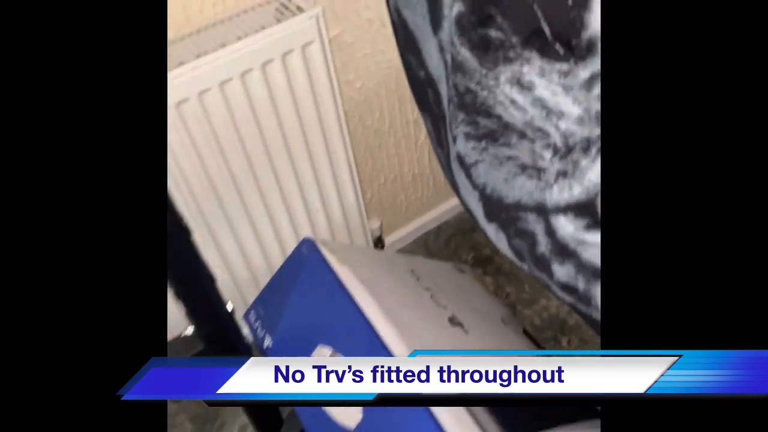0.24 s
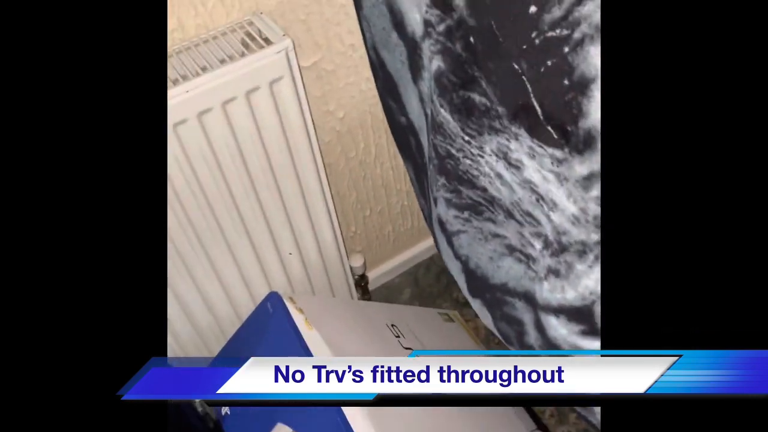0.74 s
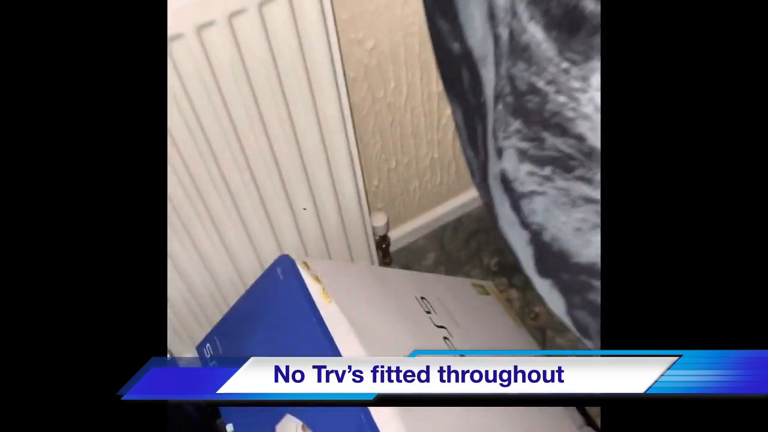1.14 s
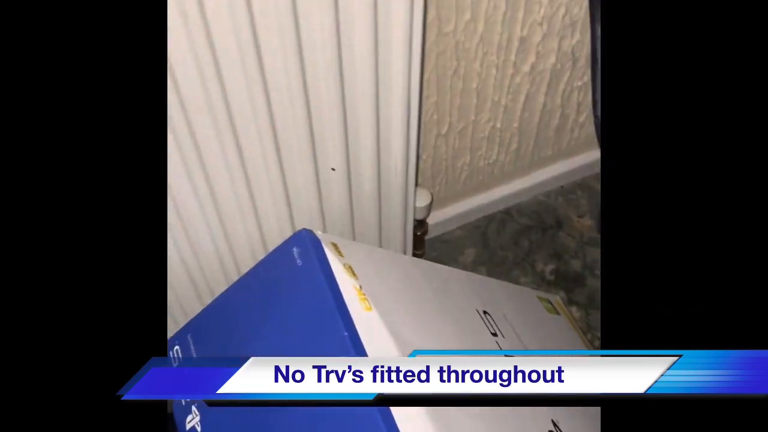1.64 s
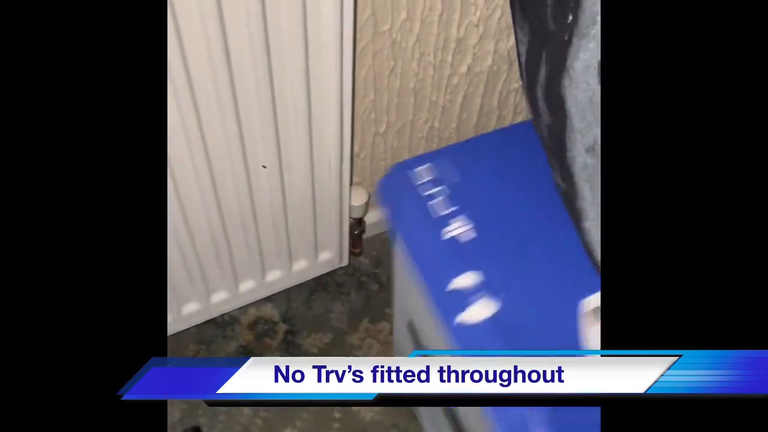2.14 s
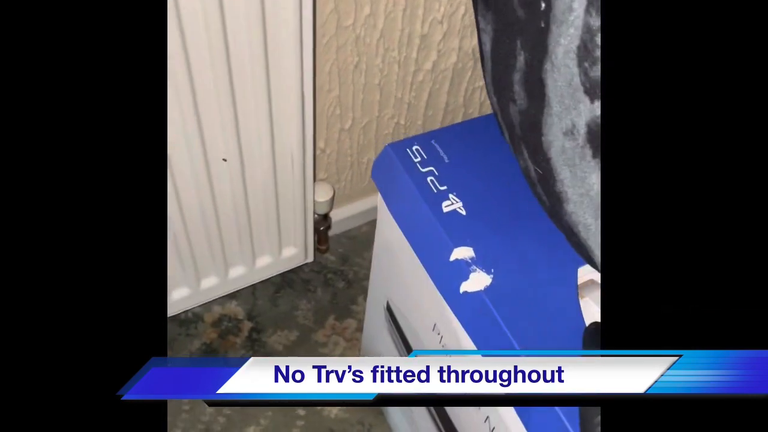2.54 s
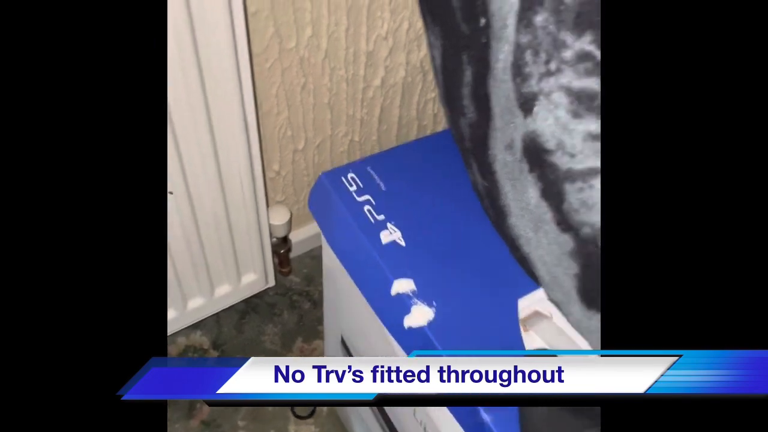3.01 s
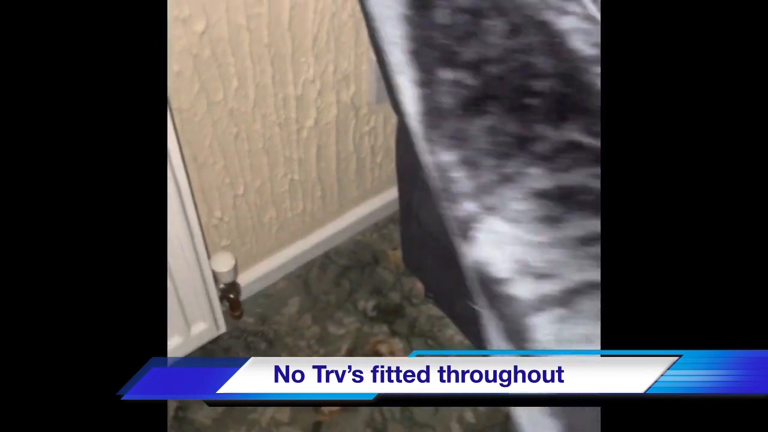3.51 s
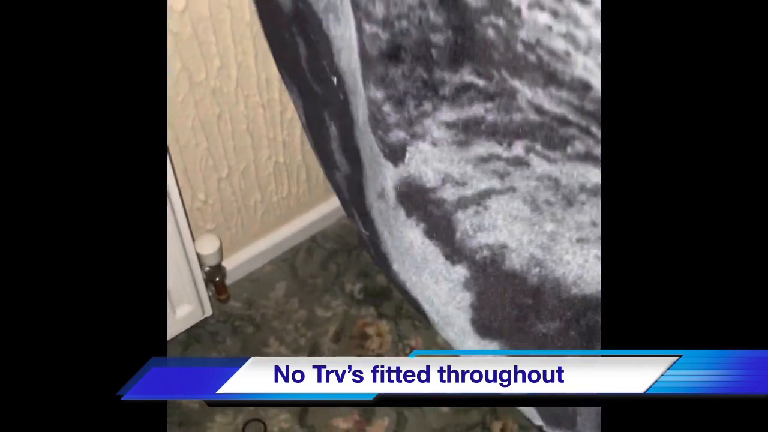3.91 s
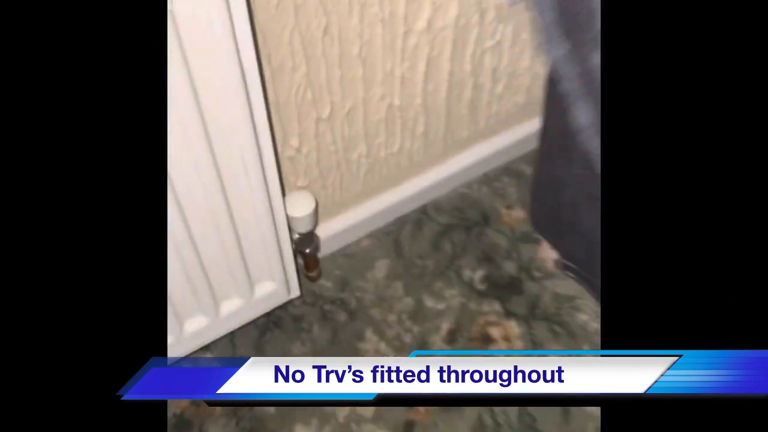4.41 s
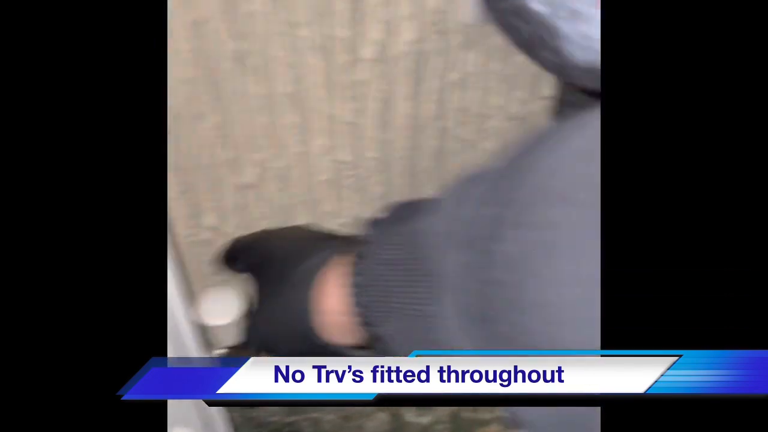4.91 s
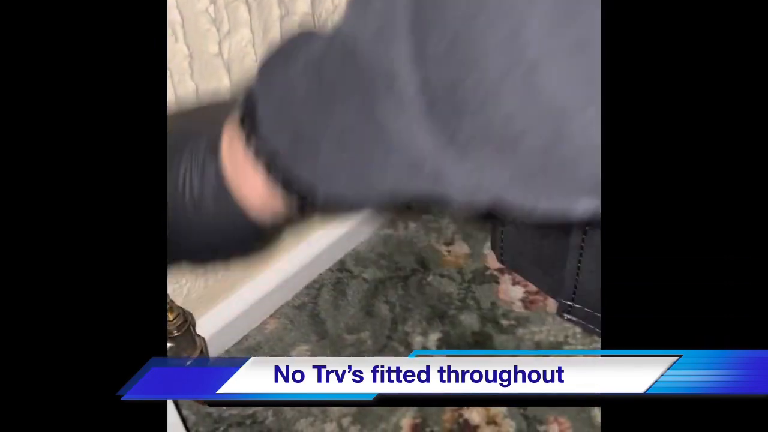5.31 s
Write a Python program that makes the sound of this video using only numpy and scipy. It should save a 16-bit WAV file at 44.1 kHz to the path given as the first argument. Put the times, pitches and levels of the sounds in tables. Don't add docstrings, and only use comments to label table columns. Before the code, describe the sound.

A small carpeted room with quiet, deep air, heard closely on a phone. At 0.0 s a light, loose-frame knock rattles, then faint brushing and soft footfalls follow, with a small snap at 0.8 s. Around 1.65 s a hollow cardboard box bumps sharply, crackling and booming. From 2.0 to 2.45 s it is shifted with taps, snaps and a heavier floor thud near 2.2 s; more dull slaps and booms come at 2.75 and 2.93 s. Cloth and board rustle at 3.2 to 3.9 s with weaker knocks. A bright tap and a small thin ring land about 4.2 s, a soft foot thud at 4.67 s, then near quiet with tiny ticks around 4.9 s. From 5.1 s a stiff valve squeals and groans, rising to a pipe note; at 5.26 s a loud, hard crack rings the steel radiator, bouncing, clattering and fading to the end.

```python
import sys
import numpy as np
from scipy import signal
from scipy.fft import rfft, irfft, next_fast_len
from scipy.io import wavfile

SR = 44100
rng = np.random.default_rng(int(sys.argv[2]) if len(sys.argv) > 2 else 0)


def pcm_store(signal):
    levels = np.round(np.clip(np.atleast_2d(signal), -1, 1) * 32767)
    wavfile.write(sys.argv[1], SR, levels.astype(np.int16).T)


def ratio_of_db(decibels):
    return 10 ** (np.asarray(decibels, float) / 20)


N = 244734
T, M = np.arange(N) / SR, next_fast_len(N)
HZ = np.maximum(np.fft.rfftfreq(M, 1 / SR), 1)
JOLT_RISE_S = 0.0061


def read(points):
    hz, db = np.transpose(points)
    return ratio_of_db(np.interp(np.log(HZ), np.log(hz), db))


def shape(x, gain):
    y = irfft(rfft(x, M) * gain, M)[:N]
    return y / np.sqrt(np.mean(y ** 2))


def band(lo_hz, hi_hz):
    return 1 / np.sqrt((1 + (lo_hz / HZ) ** 6) * (1 + (HZ / hi_hz) ** 6))


def rings(peaks):
    return sum(ratio_of_db(db) / (1 + 2j * (HZ - hz) / np.clip(width, 6, 200)) for hz, width, db in peaks)


def grains(rate, depth_db, ms):
    size = (rng.random(N) < rate / SR) * ratio_of_db(depth_db * rng.random(N))
    forget = np.exp(-1000 / (ms * SR))
    return np.sqrt(1 + signal.lfilter([1], [1, -forget], size ** 2))


def swells(rows, rise_s, t60, rest_db=-120):
    power = ratio_of_db(rest_db) ** 2
    for s, hold, db in rows:
        age = T - s
        rise = np.clip(age / rise_s + .5, 0, 1) ** 2
        fade = 1000 ** (-np.maximum(age - rise_s / 2 - hold, 0) / t60)
        power = power + (ratio_of_db(db) * rise * fade) ** 2
    return np.sqrt(power)


def add(out, s, x):
    i = int(s * SR)
    out[i:i + len(x)] += x[:N - i]


def strike(modes, push_ms, rattle_db=-60, rattle_s=.1, wobble=0.):
    t = T[:SR // 2]
    slow = signal.lfilter(*signal.butter(2, 43, fs=SR), rng.standard_normal((len(modes), len(t))))
    waver = wobble * slow / slow.std()
    ring = np.zeros(len(t))
    for (hz, db, t60), w in zip(modes, waver):
        ring += ratio_of_db(db) * np.sin(2 * np.pi * hz * t + w * hz / 1000) * 1000 ** (-t / min(t60, 1))
    force = ratio_of_db(rattle_db) * rng.standard_normal(len(t)) * 1000 ** (-t / rattle_s)
    force[0] = 1
    force = np.convolve(force, np.hanning(int(push_ms * SR / 1000) + 3))
    y = signal.fftconvolve(ring, force)[:len(t)]
    return y / np.abs(y).max()


def taps(rows, treble_db, rise_s=0.004, narrow=2.6):
    out, t = np.zeros(N), T[:8192]
    noise = rng.standard_normal((len(rows), 8192))
    hz_axis = np.fft.rfftfreq(8192, 1 / SR) + 1
    edge = ratio_of_db(treble_db - 10.0) * (hz_axis / 3000) / (1 + (hz_axis / 4500) ** 4.3)
    for (s, db, hz, t60), v in zip(rows, noise):
        board = 1 / (1 + (narrow * (hz_axis / hz - hz / hz_axis)) ** 2) ** 0.63
        fade = 1000 ** (-t / np.clip(t60, .006, .3))
        body, bright = irfft(rfft(v) * board), irfft(rfft(v) * edge)
        burst = (body + bright * fade ** (1 / 0.71 - 1)) / (body + bright).std()
        add(out, s, ratio_of_db(db - 2) * burst * (1 - np.exp(-t / rise_s)) * fade)
    return out


def thuds(rows, over_db):
    ratios = (.6, 1.452, 2.1, 2.899)
    out, t = np.zeros(N), T[:SR // 4]
    chance = rng.random((len(rows), 2, len(ratios)))
    for (s, db, hz, t60), (bend, turn) in zip(rows, chance):
        t60 = np.clip(t60, .03, .35)
        ring = np.sin(2 * np.pi * hz * t) * 1000 ** (-t / t60)
        for ratio, b, p in zip(ratios, bend, turn):
            over_hz = hz * ratio * (.9 + 0.21 * b)
            ring += ratio_of_db(over_db) * np.sin(2 * np.pi * (over_hz * t + p)) * 1000 ** (-t / (0.52 * t60))
        add(out, s, ratio_of_db(db + 1.0) * ring * (1 - np.exp(-t * hz / 0.42)))
    return out


def tail(t60, top_hz):
    t = T[:SR // 2]
    v = signal.lfilter(*signal.butter(1, top_hz, fs=SR), rng.standard_normal(len(t)))
    v = v * 1000 ** (-t / t60) * (1 - np.exp(-(t / .004) ** 2))
    return v / np.sqrt(np.sum(v ** 2))


def room_air():
    # pitch_hz, level_db (per Hz)
    air_colour = [(16, -58), (28, -1.5), (48, 3.5), (70, -5.5), (203, -10), (261, -9), (1350, -22),
                  (3850, -30.5), (5540, -45), (6500, -43), (8450, -95), (14300, -120)]
    gain = read(air_colour) * band(10, 13000)
    return np.array([ratio_of_db(-58) * shape(rng.standard_normal(N), gain) for _ in "ab"])


def ping():
    # start_s, level_db, push_ms
    ping_hit = (4.241, -40, 0.24)
    # pitch_hz, level_db, t60_s
    ping_modes = [(725, -4.5, 0.76), (728, -3, 0.25)]
    out = np.zeros(N)
    s, db, push_ms = ping_hit
    add(out, s, ratio_of_db(db) * strike(ping_modes, push_ms))
    return out


def frame_knock():
    # start_s, level_db, push_ms
    frame_hit = (0.02, -22, 0.2)
    # pitch_hz, level_db, t60_s
    frame_modes = [(333, -4.5, 0.128), (383.7, -1, 0.23), (427, -28, 0.17), (657, -10.5, 0.26),
                   (800, -21, 0.4), (1210, -27, .12), (1980, -10, 0.13)]
    out = np.zeros(N)
    s, db, push_ms = frame_hit
    add(out, s, ratio_of_db(db) * strike(frame_modes, push_ms, rattle_db=-31.0, rattle_s=0.031, wobble=2.2))
    return out


def panel_blow():
    # start_s, level_db, push_ms
    crack_hit = (5.263, -4.3, .08)
    # pitch_hz, level_db, t60_s
    crack_modes = [(1470, 18, 0.004), (1100, 4, 0.012), (5870, -2, 0.0075), (2780, -10.5, 0.023),
                   (10940, 9, 0.0039), (12800, 7, 0.0061), (14200, -11, .002)]
    # late_s, level_db
    crack_blows = [
        (0, -9),
        (.0007, 0),
        (.00138, -3),
    ]
    # start_s, level_db, push_ms
    panel_hits = [
        (5.263, -21.5, 0.08),
        (5.282, -28.5, 0.19),
        (5.297, -34.5, 0.32),
    ]
    # pitch_hz, level_db, t60_s
    panel_modes = [(401, -7, 0.21), (500, -10.5, 0.98), (541, 1.5, 0.1), (619, -8, 0.3), (990, -20, 0.48),
                   (1042, -2.5, 0.79), (1065, -13, 0.48), (1100, -3, 0.61), (1178, 6.5, 0.096),
                   (1220, -20, 0.36), (1392, 13.5, 0.038), (1441, -27, 0.42), (1540, -5, 0.19),
                   (1575, -4, 0.27), (1700, -22, 0.23), (1910, -23, .2), (2358, -16, .28),
                   (2740, -13, 0.22), (2630, -17, 0.6), (2970, -24, 0.21), (3430, -25, 0.18)]
    out = np.zeros(N)
    start, db, push_ms = crack_hit
    crack = ratio_of_db(db) * strike(crack_modes, push_ms)
    for late, blow_db in crack_blows:
        add(out, start + late, ratio_of_db(blow_db) * crack)
    for s, db, push_ms in panel_hits:
        add(out, s, ratio_of_db(db) * strike(panel_modes, push_ms, rattle_db=-25.5, rattle_s=0.42, wobble=0.85))
    return out


def panel_sway():
    # start_s, level_db, push_ms
    sway_hit = (5.296, -20, 7.8)
    # pitch_hz, level_db, t60_s
    sway_modes = [(51, -1, 1), (123, -9, 0.78), (89.5, -12, 0.37), (232, -18, .4)]
    out = np.zeros(N)
    s, db, push_ms = sway_hit
    add(out, s, ratio_of_db(db) * strike(sway_modes, push_ms))
    return out


def panel_shudder():
    # time_s, level_db
    shudder_path = [
        (5.105, -52),
        (5.125, -39),
        (5.17, -40),
        (5.185, -48),
        (5.205, -35.5),
        (5.26, -40),
        (5.3, -45.5),
        (5.55, -45.5),
    ]
    # pitch_hz, width_hz, level_db
    shudder_modes = [(52.6, 16, 5), (92, 22, 4.5), (178, 26, -6.5)]
    s, db = np.transpose(shudder_path)
    return ratio_of_db(np.interp(T, s, db, -120)) * shape(rng.standard_normal(N), rings(shudder_modes))


def sheet_clatter():
    # start_s, peak_db, centre_hz, t60_s
    clatter_rows = [
        (5.266, -29, 2230, .16),
        (5.27, -31, 3050, .14),
        (5.267, -33, 6000, .04),
        (5.3, -33, 1600, .3),
        (5.31, -44, 2800, .25),
    ]
    return taps(clatter_rows, -60, rise_s=0.0014, narrow=5.5)


def valve():
    # time_s, slip_hz, squeal_db, grip_db (grip feeds overtones and grind)
    groan_path = [
        (5.098, 500, -59, -76),
        (5.133, 524, -35, -56),
        (5.16, 549.6, -30, -48.5),
        (5.184, 575, -40.5, -43.5),
        (5.199, 581, -27, -46),
        (5.227, 580.6, -30.5, -48),
        (5.26, 559, -59, -39.5),
        (5.298, 500, -41, -37.5),
        (5.34, 510, -65, -83),
    ]
    # start_s, hold_s, level_db
    pipe_jolt = (5.222, 0.041, -39)
    # pitch_hz, width_hz, level_db
    pipe_modes = [(425.6, 9.5, 2), (476, 10, -6.5)]
    # pitch_hz, width_hz, level_db
    grind_modes = [(1400, 70, -6), (1680, 80, -2), (2300, 90, -8), (2880, 90, -12), (3900, 150, -18)]
    s, hz, squeal_db, grip_db = np.transpose(groan_path)
    grind_db = -36 + 1.1 * (grip_db + 40)
    squeal, over, grind = (ratio_of_db(np.interp(T, s, db, -120, -120)) for db in (squeal_db, grip_db, grind_db))
    pipe = ratio_of_db(-11.5) * squeal + swells([pipe_jolt], JOLT_RISE_S, t60=0.21)
    wobble, flutter = (shape(rng.standard_normal(N), band(0.71, 66.5)) for _ in "ab")
    turn = 2 * np.pi * np.cumsum(np.interp(T, s, hz) * (1 + 0.0181 * wobble)) / SR
    overtones = np.sin(2 * turn) + 0.17 * np.sin(3 * turn) + 0.059 * np.sin(4 * turn)
    tone = squeal * np.sin(turn) + over * overtones
    slip = grains(rate=230.0, depth_db=9.0, ms=3.0) * rng.standard_normal(N)
    out = np.sqrt(2) * tone * ratio_of_db(1.8 * flutter)
    out += pipe * shape(slip, rings(pipe_modes))
    return out + grind * shape(slip, band(670, 1050) + 0.3 * rings(grind_modes))


def pipe_singing():
    # start_s, hold_s, level_db, pitch_hz
    sing_rows = [
        (5.193, 0.029, -30, 540),
        (5.222, .035, -27, 425),
        (5.232, .025, -30.5, 487),
        (5.2, 0.038, -43, 797),
        (5.175, .02, -39.5, 1125),
        (5.135, .03, -41, 470),
    ]
    out = np.zeros(N)
    for s, hold, db, hz in sing_rows:
        waver = 0.57 * shape(rng.standard_normal(N), band(1, 38))
        level = swells([(s, hold, db)], JOLT_RISE_S * 2, t60=0.14)
        out += np.sqrt(2) * level * np.sin(2 * np.pi * hz * T + waver)
    return out


def footfalls():
    # start_s, peak_db, pitch_hz
    step_rows = [(0.445, -37.5, 59), (.979, -38, 48.3), (1.274, -30, 65), (1.406, -37, 52),
                 (1.708, -26, 67), (2.19, -17.5, 68), (2.312, -27.5, 53), (3.243, -34.5, 71),
                 (3.386, -44, 67.5), (3.641, -37, 70), (3.7, -29, 57.7), (4.289, -34.5, 51),
                 (4.466, -30, 59.2), (4.671, -18.5, 63.8), (4.747, -35, 78.4), (5.262, -21.5, 92),
                 (5.303, -22, 150.4)]
    return thuds([(*row, 0.13) for row in step_rows], over_db=-10)


def strokes():
    # start_s, length_s, level_db, centre_hz, width (share of centre)
    stroke_rows = [(0.225, 0.046, -65, 1900, 0.27), (0.279, 0.036, -58, 1940, 0.25),
                   (0.861, 0.035, -52.5, 1840, 0.34), (0.888, 0.055, -58, 2180, 0.44),
                   (0.956, 0.04, -52.5, 515, 0.72), (1.232, 0.032, -59.5, 2130, 0.26),
                   (1.706, 0.076, -51.5, 2100, 2.2), (2.02, 0.039, -48, 1750, 1.2),
                   (2.882, 0.024, -49, 1700, 0.66), (3.276, 0.059, -52, 2970, 2.5),
                   (3.518, 0.083, -49.5, 3040, 4), (3.64, 0.067, -54.5, 3120, 0.57),
                   (3.867, 0.055, -57, 1980, 0.53), (4.07, .11, -53.5, 3140, 0.71)]
    out = np.zeros(N)
    for s, length, db, hz, width in stroke_rows:
        edges = [hz / (1 + width / 2), hz * (1 + width / 2)]
        bandpass = signal.butter(2, edges, "bandpass", fs=SR, output="sos")
        v = signal.sosfilt(bandpass, rng.standard_normal(8192))
        swell = np.hanning(int(1.5 * length * SR))
        add(out, s - length / 4, ratio_of_db(db) * swell * v[-len(swell):] / v.std())
    return out


def shuffle():
    # start_s, hold_s, floor_rumble_db, box_boom_db (above the rumble)
    shift_rows = [(0.0, 0.1, -52, -5.5), (0.344, 0.18, -61.5, -0.5), (0.81, 0.16, -57, -1),
                  (1.193, 0.18, -49.5, -2.5), (1.675, 0.1, -42.5, -10.5), (1.86, 0.065, -53, -6),
                  (2.028, 0.069, -40.5, -14), (2.176, 0.1, -42, 4.5), (2.383, 0.18, -44.5, -9.5),
                  (2.692, 0.064, -40.5, -1), (2.883, 0.1, -40.5, 3), (3.22, 0.32, -57, 4.5),
                  (3.532, 0.14, -40, -1), (3.698, 0.24, -44.5, -2.5), (4.181, 0.049, -43.5, 1.5),
                  (4.446, 0.28, -54, -10), (4.586, 0.11, -46.5, -10.5), (5.25, 0.13, -36.5, -7.5)]
    # start_s, hold_s, cloth_hiss_db, board_scrape_db (above the hiss)
    brush_rows = [(0.025, 0.044, -56, 5.5), (0.193, 0.35, -63.5, 1), (0.81, 0.11, -61.5, 3.5),
                  (1.236, 0.12, -59.5, 4), (1.643, 0.057, -60.5, 14), (2.018, 0.15, -57.5, -4.5),
                  (2.166, 0.044, -56, 15), (2.344, 0.18, -61, 5.5), (2.687, 0.082, -64, 8.5),
                  (2.863, 0.21, -60.5, 0), (3.195, 0.26, -70.5, 9), (3.511, 0.16, -52.5, 1.5),
                  (3.778, 0.26, -65.5, 3), (4.07, 0.048, -54, -1), (4.201, 0.23, -57, 2),
                  (4.466, 0.19, -59, -3.5), (4.67, 0.3, -60, 0), (5.187, 0.14, -85, 21)]
    # rumble_db, box_db, board_db, cloth_db
    rest_levels = (-58, -75.5, -107.5, -68.5)
    # pitch_hz, level_db (per Hz)
    rustle_colour = [(30, 6), (52, 21), (130, 10.5), (600, -4), (2500, -8), (4500, -13.5), (6500, -15.5),
                     (8000, -13.5), (10500, -20.5), (13000, -24), (15400, -21), (17000, -44)]
    rumble_rest, box_rest, board_rest, cloth_rest = rest_levels
    rise_s, shift_t60, brush_t60 = .03, 0.39, 0.34
    rumble = swells([(s, hold, db) for s, hold, db, _ in shift_rows], rise_s, shift_t60, rumble_rest)
    body = swells([(s, hold, db + up) for s, hold, db, up in shift_rows], rise_s, shift_t60, box_rest)
    scrape = swells([(s, hold, db + up) for s, hold, db, up in brush_rows], rise_s, brush_t60, board_rest)
    cloth = swells([(s, hold, db) for s, hold, db, _ in brush_rows], rise_s, brush_t60, cloth_rest)
    colour = read(rustle_colour)
    catch = grains(rate=90., depth_db=8.5, ms=4.0)
    layers = ((rumble, grains(rate=69.0, depth_db=14.5, ms=8.2), band(12, 198)),
              (body, catch * grains(rate=38.0, depth_db=11.5, ms=23.0), band(170, 477)),
              (scrape, catch, band(360, 2630)),
              (cloth, catch ** 0.45, band(3010, 19600)))
    rows = np.zeros((2, N))
    for row in rows:
        for level, grain, gain in layers:
            row += level * shape(grain * rng.standard_normal(N), colour * gain)
    return rows


def box_booms():
    # start_s, peak_db, pitch_hz, t60_s
    boom_rows = [(.802, -52, 154, 0.33), (1.214, -44, 225, 0.16), (1.341, -43.5, 153, 0.54),
                 (1.644, -28.5, 152.3, 0.53), (1.668, -14.5, 207.8, 0.16), (1.672, -19.5, 106, 0.14),
                 (1.899, -40.5, 114.6, 0.29), (2.057, -19.5, 137, 0.068), (2.141, -29.5, 203, 0.052),
                 (2.219, -15, 127.6, 0.068), (2.249, -27.5, 219, 0.095), (2.419, -34, 113, 0.095),
                 (2.549, -35, 155.2, 0.13), (2.711, -37, 125, 0.39), (2.741, -18.5, 139.5, .13),
                 (2.932, -18, 175.7, 0.081), (2.947, -15.5, 181, .054), (3.012, -36, 256.7, 0.084),
                 (3.553, -26.5, 111, 0.128), (3.563, -27.5, 303.6, 0.11), (3.76, -38, 204, 0.16),
                 (3.809, -39.5, 204.6, 0.38), (3.858, -32.5, 185, 0.083), (3.934, -31, 109, 0.091),
                 (4.185, -26, 316, 0.024), (4.225, -28.5, 102, 0.1), (5.265, -23.5, 111, 0.26)]
    return thuds(boom_rows, over_db=-12)


def board_taps():
    # start_s, peak_db, centre_hz, t60_s
    slap_rows = [(1.641, -34, 1280, 0.037), (1.914, -34, 1120, 0.025), (2.243, -19.5, 900, 0.02),
                 (2.708, -28, 785, 0.035), (2.735, -15.5, 940, 0.028), (2.917, -22, 657, 0.085),
                 (2.928, -15.5, 1630, 0.026), (3.214, -30.5, 600, 0.023), (3.391, -46, 710, 0.12),
                 (3.749, -42, 920, 0.061), (4.194, -36, 1030, 0.071), (4.575, -41.5, 556, 0.058)]
    # start_s, peak_db, centre_hz, t60_s
    knock_rows = [(.447, -50, 630, 0.22), (1.895, -39, 714, 0.02), (2.138, -35, 1770, 0.074),
                  (2.049, -28.5, 393, 0.033), (2.199, -26.5, 594, 0.088), (2.308, -22.5, 394, 0.039),
                  (2.519, -36, 724, 0.03), (2.767, -30.5, 730, 0.028), (2.89, -36.5, 1360, 0.087),
                  (2.949, -30, 800, 0.055), (3.014, -40.5, 890, 0.074), (3.253, -29, 907, 0.026),
                  (3.563, -30, 536, 0.034), (3.632, -28, 2960, 0.043), (3.933, -32.5, 440, 0.037),
                  (4.548, -42.5, 1130, 0.046), (4.666, -40.5, 545, 0.058), (5.292, -13, 1130, 0.025)]
    # start_s, peak_db, centre_hz, t60_s
    snap_rows = [(.016, -21.5, 935, 0.087), (.809, -30, 2500, 0.021), (1.283, -52, 780, 0.23),
                 (1.6695, -21, 836, 0.041), (2.043, -18.5, 1540, 0.018), (2.181, -38, 614, 0.21),
                 (2.38, -45, 2300, 0.17), (2.411, -24, 1700, 0.03), (3.854, -31.5, 1000, 0.035),
                 (4.184, -19.5, 1150, 0.037), (4.209, -26, 1200, 0.04), (4.237, -37, 696, 0.09),
                 (4.432, -36, 796, 0.035), (5.226, -30, 615, 0.025)]
    # start_s, peak_db, centre_hz, t60_s
    tick_rows = [
        (2.434, -31, 875, 0.017),
        (3.101, -47, 1750, .015),
        (4.929, -40, 10000, 0.012),
        (4.981, -43, 10000, 0.011),
    ]
    out = taps(slap_rows, treble_db=-56) + taps(knock_rows, treble_db=-21)
    return out + taps(snap_rows, treble_db=0) + taps(tick_rows, treble_db=11, rise_s=0.00088)


def crackles():
    # start_s, peak_db, centre_hz, t60_s
    crackle_rows = [(1.617, -46, 1200, .02), (1.67, -16, 1100, .04), (1.6415, -37, 3800, .02),
                    (1.655, -41, 3800, .03), (1.6695, -22, 3200, 0.025), (1.896, -45.5, 2200, 0.016),
                    (1.94, -48, 1180, 0.021), (2.138, -35, 2200, 0.022), (2.181, -31, 1500, 0.029),
                    (2.187, -40, 2350, .02), (2.207, -33, 2000, .03), (2.244, -32, 1100, 0.018),
                    (2.259, -44, 5030, .025), (2.309, -38.5, 2500, 0.018), (2.38, -42, 4250, .025),
                    (2.393, -40, 2300, 0.022), (2.413, -30, 2200, 0.02), (2.491, -40, 1550, 0.036),
                    (2.709, -33, 900, .02), (2.73, -44, 4200, 0.017), (2.738, -23.5, 1320, 0.024),
                    (2.768, -36, 1200, 0.027), (2.892, -35, 1500, .025), (2.929, -29, 2500, .02),
                    (3.284, -43, 3500, .03), (3.536, -39, 2780, .02), (3.543, -35, 2970, .02),
                    (3.556, -38, 2900, .015), (3.635, -34, 3300, 0.023), (3.662, -45, 2900, 0.018),
                    (3.674, -36, 2840, .025), (3.89, -48, 3000, 0.026), (4.112, -43, 3500, .03),
                    (4.237, -31, 2200, 0.018), (4.883, -45, 5200, 0.017), (4.896, -49, 5200, .015),
                    (4.931, -44, 4200, .02), (4.955, -50, 3500, .015), (5.197, -33, 900, .03),
                    (1.671, -24, 2100, .04), (2.72, -35, 800, .06), (2.742, -30, 1900, .025),
                    (2.755, -38, 1100, .07), (2.322, -38, 1200, .04), (2.52, -42, 1500, .04),
                    (3.77, -44, 1500, .03)]
    return taps(crackle_rows, -57, rise_s=0.0014, narrow=3.9)


def treble_pricks():
    # start_s, peak_db, centre_hz, t60_s
    prick_rows = [(1.641, -40, 10500, .012), (1.656, -48, 9000, .015), (1.6695, -24, 10500, .007),
                  (2.045, -45, 7000, .015), (2.436, -43, 7500, .015), (2.708, -51, 9000, 0.011),
                  (2.729, -46, 8600, .015), (3.101, -42, 9500, 0.013), (3.694, -44, 9000, .012),
                  (3.717, -45, 10500, 0.014), (3.775, -54, 11000, .012), (4.185, -44, 9000, .012),
                  (4.896, -54, 11000, .012), (5.2635, -29, 8000, .012), (5.293, -48, 9500, 0.014)]
    return taps(prick_rows, -60, rise_s=0.00088, narrow=1.5)


def pops():
    # start_s, peak_db, pitch_hz, t60_s
    pop_rows = [(1.6412, -26, 1330, .025), (1.897, -48, 800, .02), (1.917, -40, 1300, .02),
                (2.244, -27, 1000, .015), (2.709, -34, 880, .02), (2.7375, -28, 960, .025),
                (2.768, -33, 520, .025), (2.93, -24, 740, .025), (3.543, -41, 2950, .015),
                (3.5565, -40, 2900, .012), (3.674, -42, 2850, .015), (3.855, -40, 1000, .02),
                (3.936, -34, 440, .03), (5.197, -27, 580, .04)]
    out = np.zeros(N)
    for s, db, hz, t60 in pop_rows:
        add(out, s, ratio_of_db(db) * strike([(hz, 0, t60), (1.31 * hz, -10, t60)], push_ms=0.35))
    return out


def two_ports(near, scattered, pricks):
    # pitch_hz, level_db
    lean_points = [(100, 0), (250, .3), (500, 1.2), (900, 2.8), (1500, 2.2), (2500, 0), (15000, 0)]
    # pitch_hz, lead (radians)
    lead_points = [(60, 0), (1460, -.2), (1900, 0), (2670, .9), (3620, -.6), (5340, 0), (6900, 2.6),
                   (7700, 3.14), (8600, 3.7), (10000, 5.8), (12200, 6.6), (13200, 8.9), (14200, 9.4),
                   (15100, 9.9), (15600, 10.6)]
    # pitch_hz, level_db
    diffuse_points = [(100, -33), (250, -29), (450, -11), (1200, -13), (2500, -8), (5000, -7), (6500, -14),
                      (7700, -30), (9000, -20), (15000, -18)]
    mid, side = rfft(near, M), rfft(scattered, M) * read(diffuse_points)
    hz, lead = np.transpose(lead_points)
    lean = np.sqrt(read(lean_points)) * np.exp(.5j * np.interp(HZ, hz, lead))
    left = irfft((mid + side) * lean, M)[:N]
    right = irfft((mid - side) / lean, M)[:N]
    return np.array([left, right]) + ratio_of_db(-3) * pricks


def scene():
    hits = board_taps() + footfalls() + box_booms() + strokes() + frame_knock() + panel_blow()
    echo = signal.fftconvolve(hits, tail(t60=0.15, top_hz=2440))[:N]
    hits = hits + ratio_of_db(-14) * echo
    hits = hits + valve() + panel_shudder() + pipe_singing() + panel_sway() + sheet_clatter() + ping()
    pricks = treble_pricks()
    hits = hits + crackles() + pricks + pops()
    near, scattered = shuffle() + room_air()
    scattered = scattered + signal.fftconvolve(hits, tail(t60=0.11, top_hz=16400))[:N]
    return two_ports(near + hits, scattered, pricks)


def low_pass(x):
    return signal.sosfilt(signal.butter(12, 16510, fs=SR, output="sos"), x)


def record(dry):
    bass = signal.butter(4, 40, "highpass", fs=SR, output="sos")
    top = signal.ellip(8, .2, 60, 15760, fs=SR, output="sos")
    mix = signal.sosfilt(top, signal.sosfilt(bass, dry))
    return low_pass(mix)


dry = scene()
out = record(dry)
pcm_store(out)
```